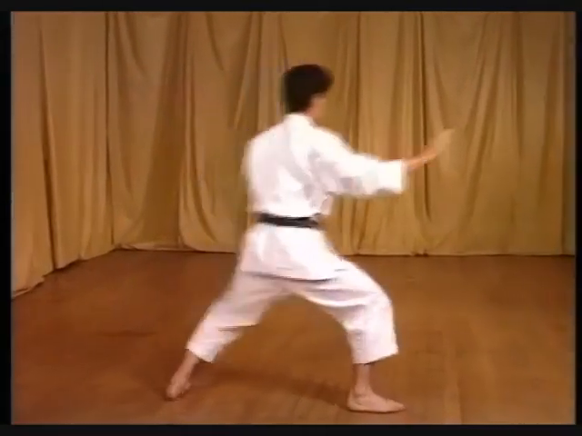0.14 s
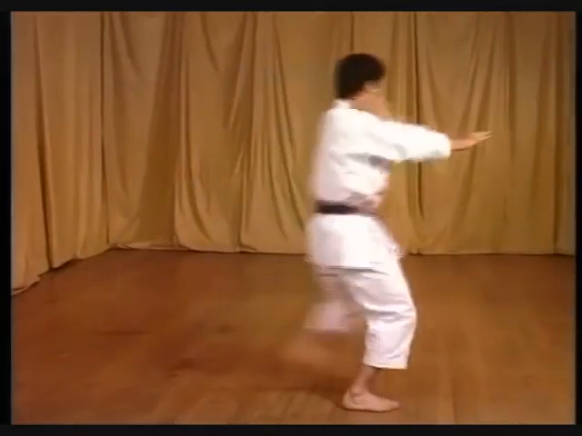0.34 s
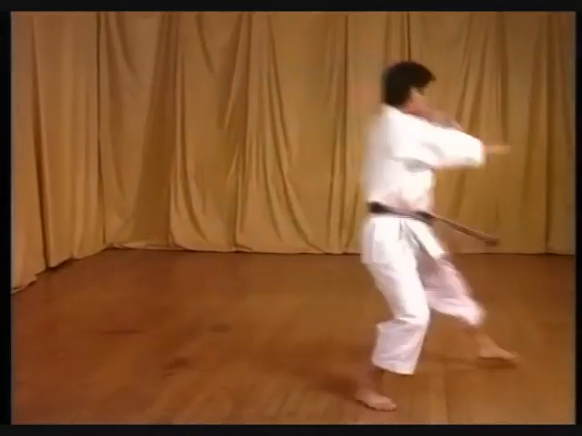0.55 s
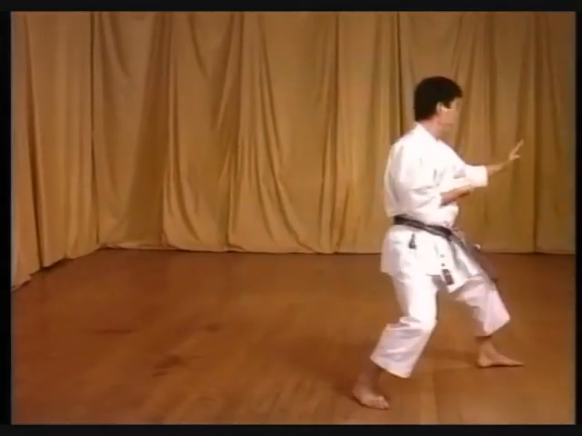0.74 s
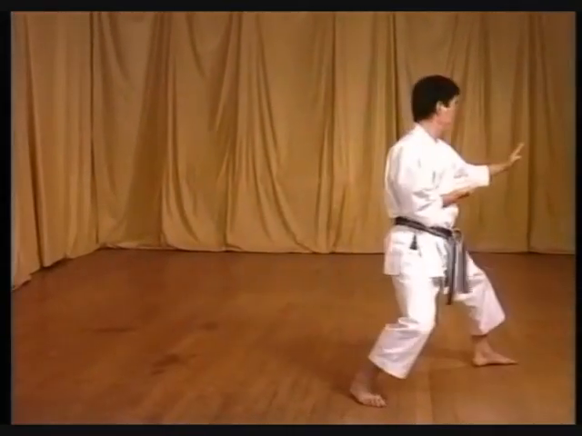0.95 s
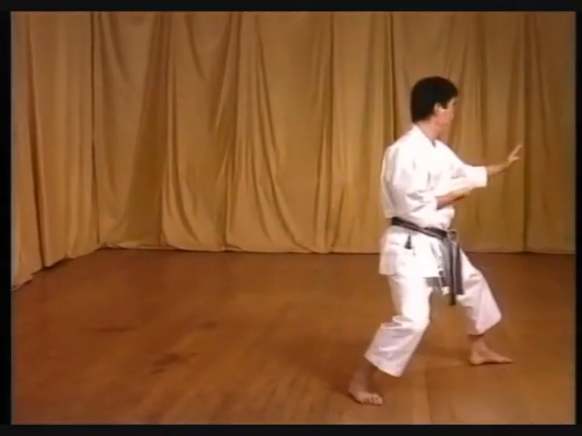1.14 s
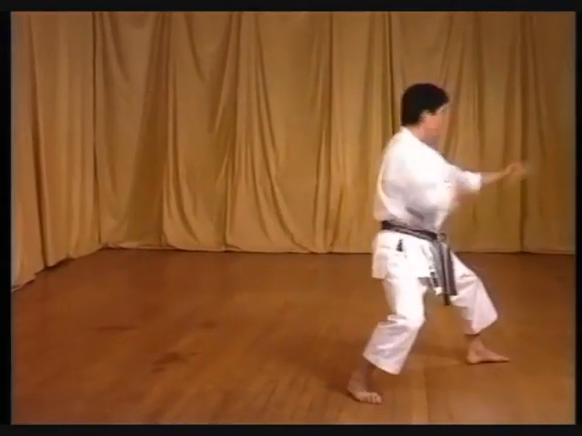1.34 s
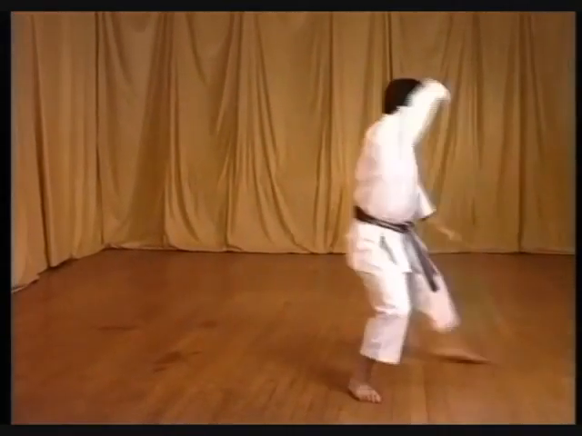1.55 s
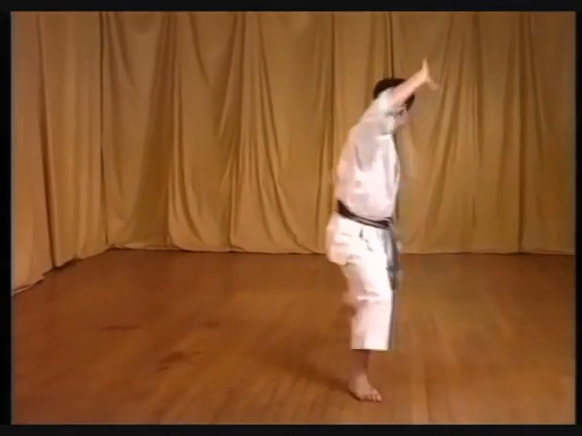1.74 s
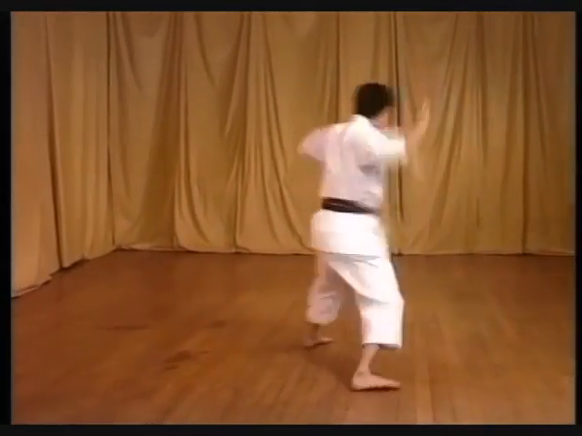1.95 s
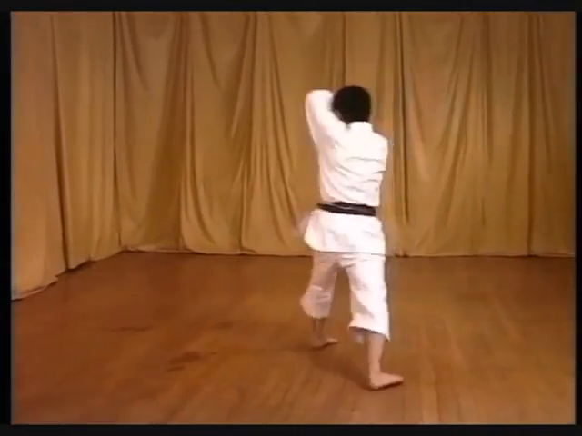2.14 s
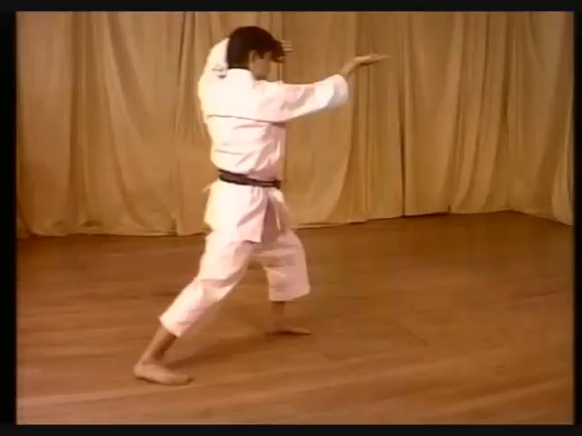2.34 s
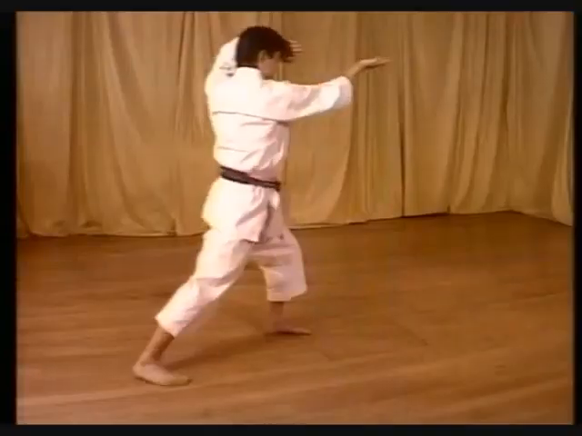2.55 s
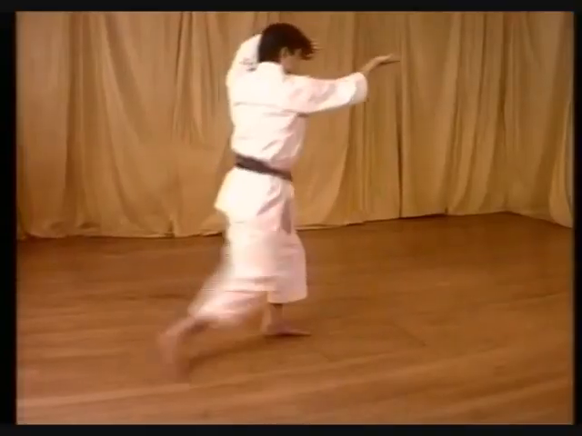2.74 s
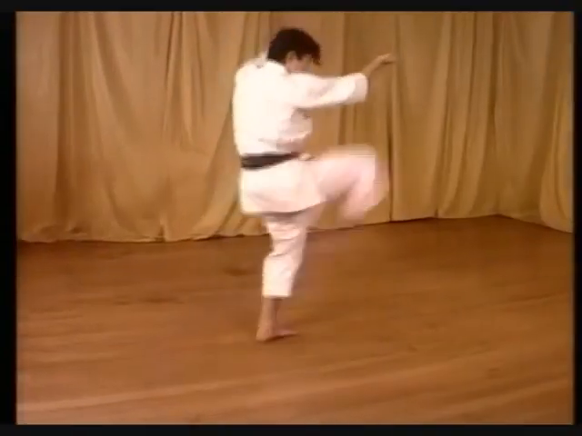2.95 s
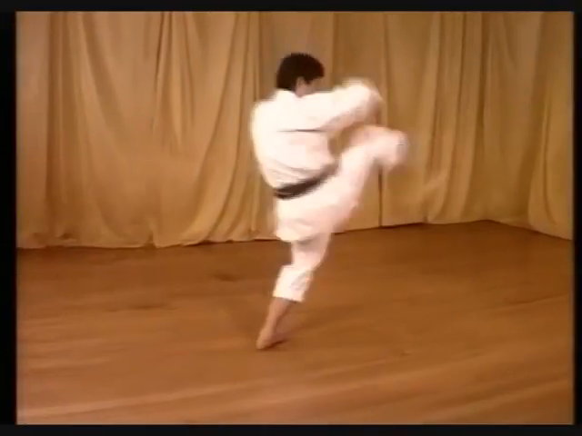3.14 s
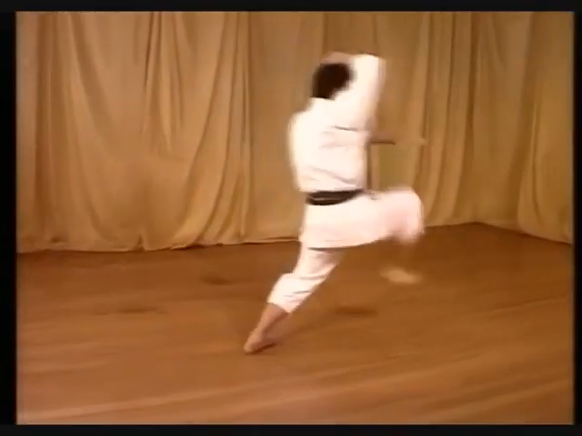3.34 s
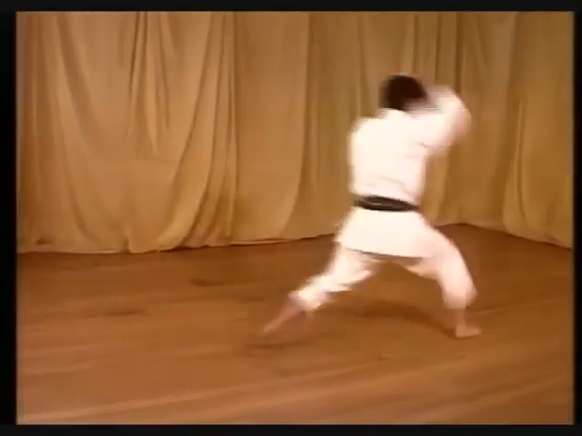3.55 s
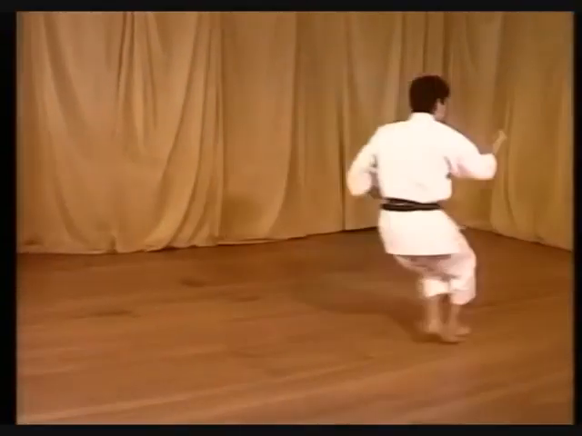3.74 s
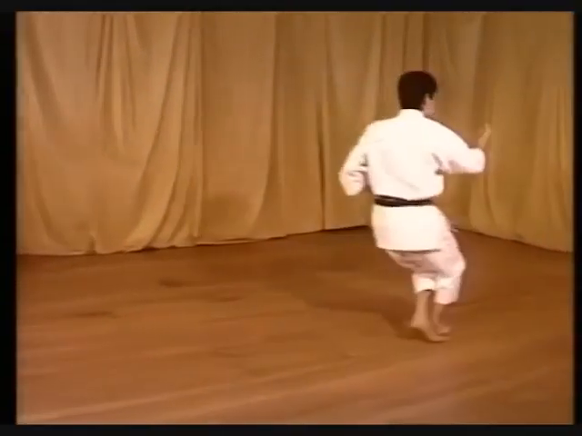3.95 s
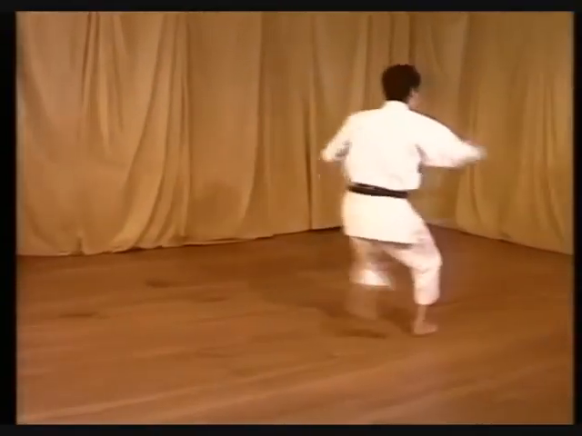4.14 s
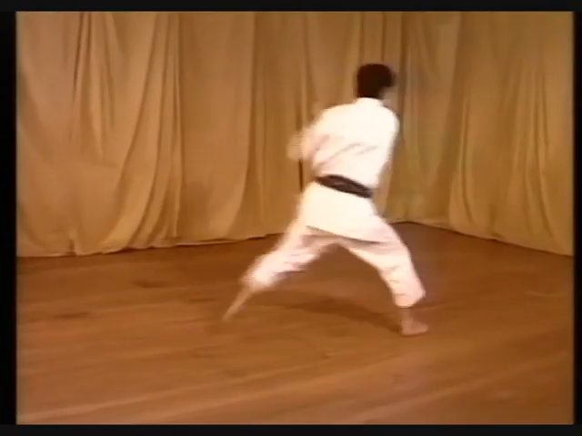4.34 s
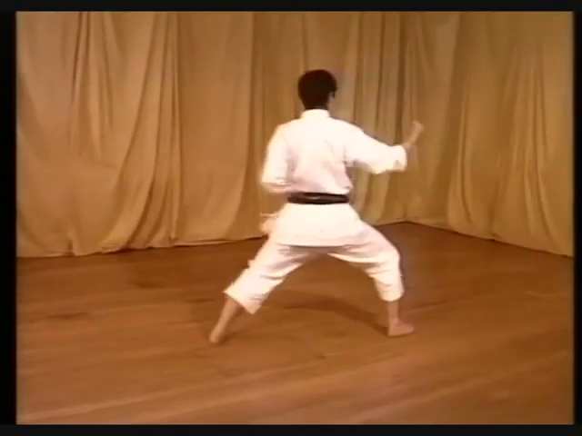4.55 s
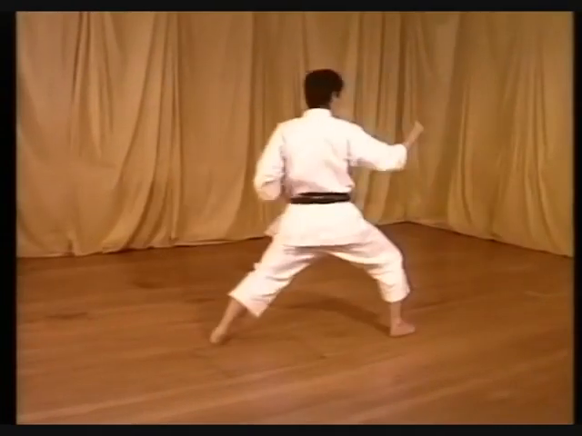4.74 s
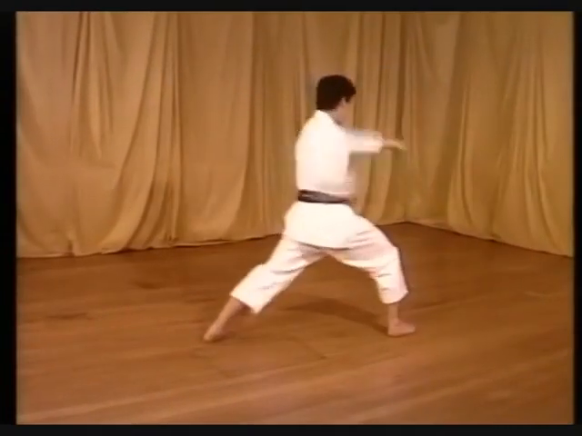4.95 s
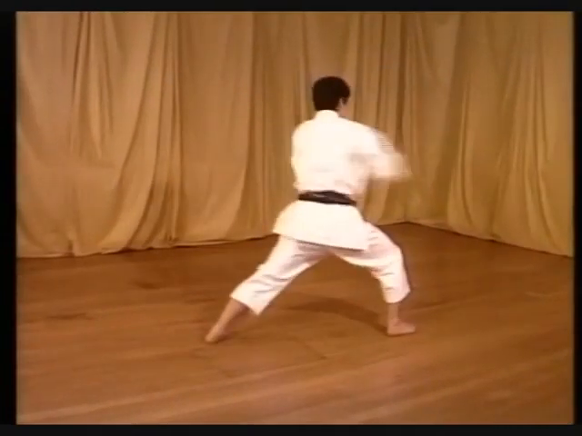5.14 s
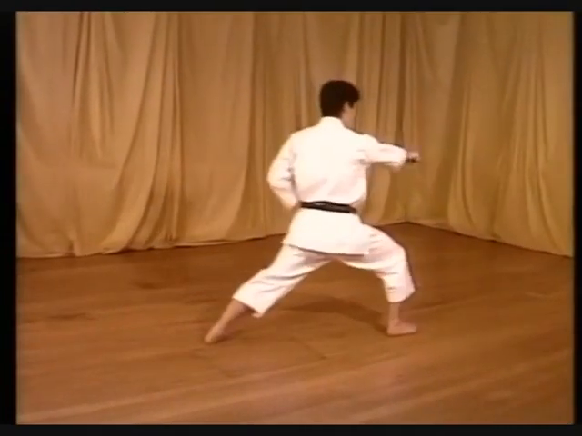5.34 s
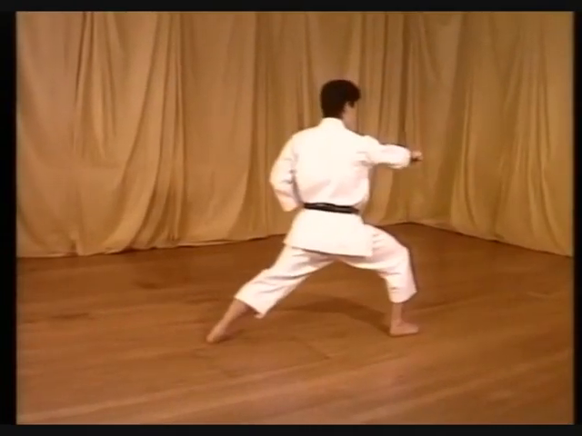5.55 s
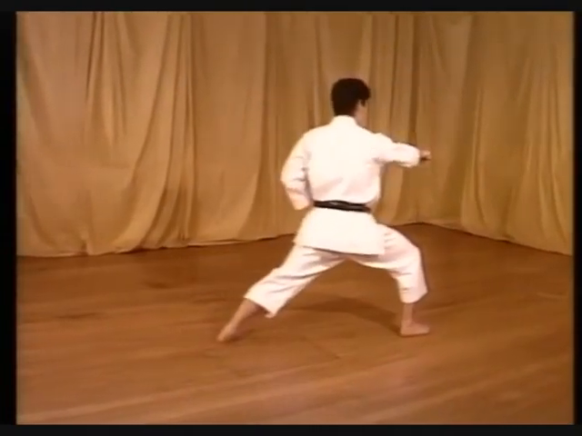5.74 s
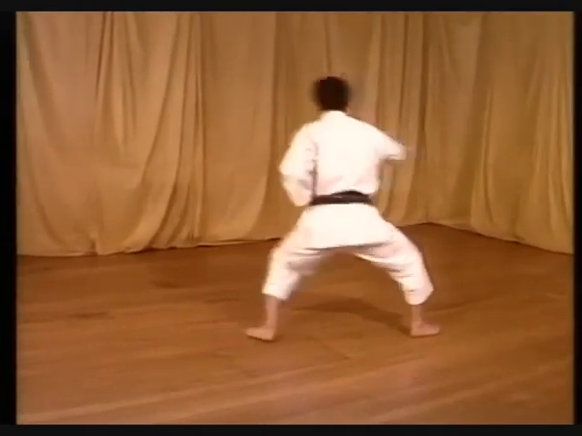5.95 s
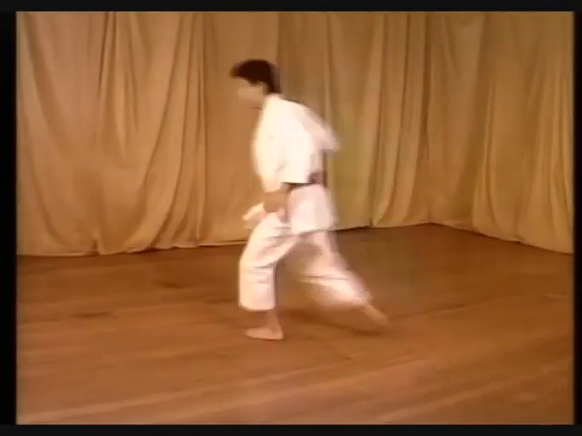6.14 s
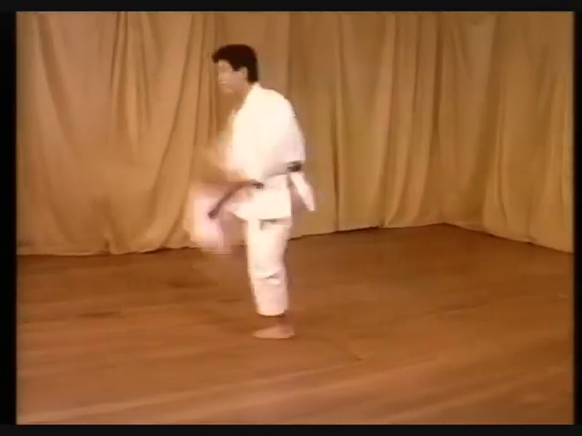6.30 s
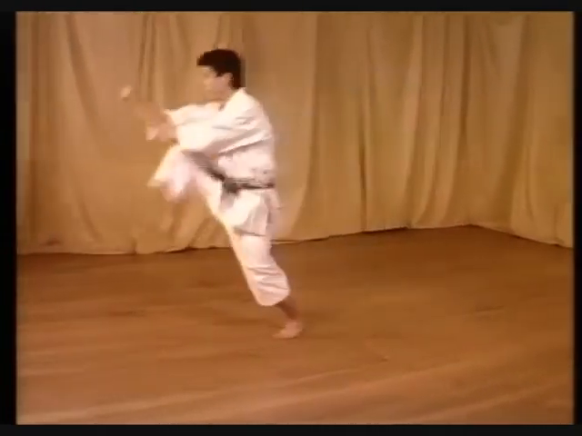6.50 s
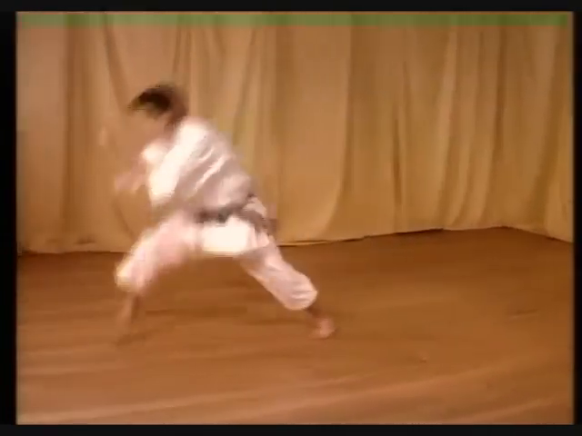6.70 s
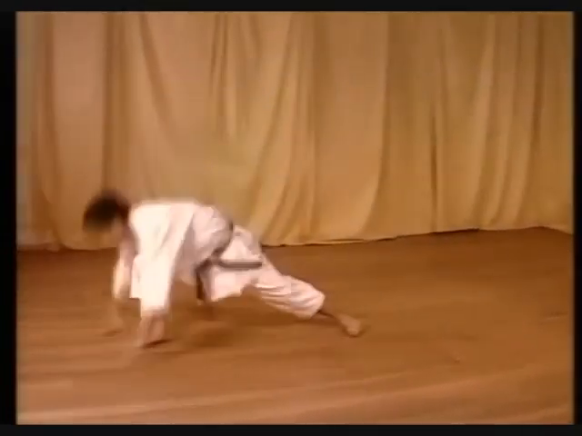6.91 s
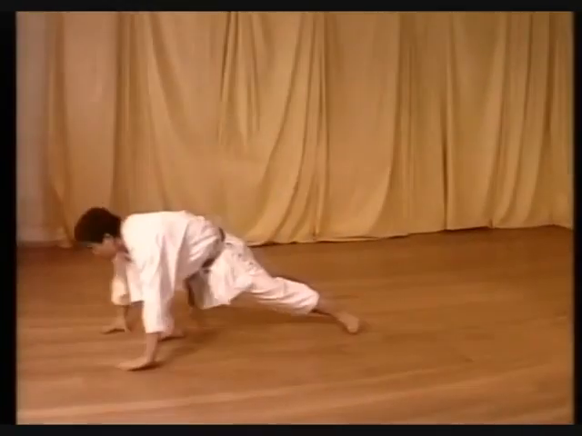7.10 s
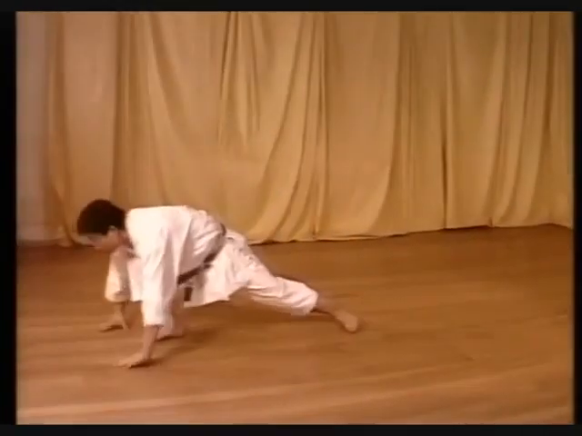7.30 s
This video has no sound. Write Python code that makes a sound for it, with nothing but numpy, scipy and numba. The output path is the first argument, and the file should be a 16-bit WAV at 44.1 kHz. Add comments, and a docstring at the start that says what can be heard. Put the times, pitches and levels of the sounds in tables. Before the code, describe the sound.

One performer in a heavy cotton suit moves through a martial arts routine on wooden boards. A short low sole squeak, soft cloth snaps and light steps come first; then a jump's hard landing, powerful sleeve snaps, and finally a heavy drop onto foot and hands. Short hall reverberation, soft hiss and hum, a single microphone with loud hits squashed.

```python
"""Cotton flaps and snaps, bare feet stamp and squeak: a karate routine on boards in a curtained hall.
Random impacts, shaped in time and spectrum, make the heavy suit rustle, flick, snap and zip.
Soles slide as banded noise, squeak as stick-slip tones, and land on boards that ring and boom.
The hall adds a decaying tail; hiss, hum and whine lie beneath. One microphone hears it all,
and a fast limiter flattens the hardest blows."""
import sys
import numpy as np
from scipy import signal
from scipy.fft import rfft, irfft
from scipy.io import wavfile
from numba import njit

SR = 44100
rng = np.random.default_rng(int(sys.argv[2]) if len(sys.argv) > 2 else 0)


def wav_record(signal):
    """Record a signal, one row per channel, as 16-bit PCM in the file named by sys.argv[1]."""
    frames = np.transpose(np.atleast_2d(signal))
    bounded = np.clip(frames, -1, 1)
    # unit amplitude maps onto the largest positive 16-bit level
    quanta = np.round(bounded * 32767).astype(np.int16)
    wavfile.write(sys.argv[1], SR, quanta)


N = 329413  # length in samples


def undb(db):
    """Level law: decibels to an amplitude ratio."""
    return 10 ** (np.asarray(db) / 20)


def unit(x):
    """Power normalisation: scale to rms 1."""
    return x / np.sqrt(np.mean(x ** 2))


def add(out, start_s, x):
    """Superposition: mix x in from start_s."""
    i = max(int(start_s * SR), 0)
    out[i:i + len(x)] += x[:N - i]


def response(spectrum, size=4096):
    """Minimum phase: the folded cepstrum gives a causal impulse response, here of unit energy."""
    hz, db = np.transpose(spectrum)
    grid = np.maximum(np.arange(size // 2 + 1) * SR / size, 1)
    level_db = np.interp(np.log(grid), np.log(hz), db)
    cepstrum = irfft(np.log(undb(level_db)))
    cepstrum[1:size // 2] *= 2
    cepstrum[size // 2 + 1:] = 0
    h = irfft(np.exp(rfft(cepstrum)))[:size // 2]
    return h / np.linalg.norm(h)


def colour(x, spectrum):
    """Linear filtering: convolution gives x the spectrum."""
    return signal.oaconvolve(x, response(spectrum))[:len(x)]


def walk(rate_hz, size):
    """Slow fluctuation: straight lines join normal random values drawn rate_hz times a second."""
    at = np.arange(size) / SR * rate_hz
    return np.interp(at, np.arange(size // 8), rng.standard_normal(size // 8))


def crackle(rate_hz, spread_db, size):
    """Shot noise: random tiny impacts of either sign and uneven strength, rms 1."""
    hits = rng.random(size) < rate_hz / SR
    signs = rng.choice([-1, 1], size)
    strength = undb(spread_db * np.clip(rng.standard_normal(size), -2, 2))
    return unit(hits * signs * strength)


def burst(t, swell_s, fade_s):
    """Transient envelope: a linear climb to 1, then exponential decay."""
    return np.minimum(t / swell_s, 1) * np.exp(-np.maximum(t - swell_s, 0) / fade_s)


def slips(rate_hz, centre_hz, width_hz, size):
    """Band excitation: quick uneven slips ring one band, rms 1."""
    edges_hz = np.clip([centre_hz - width_hz / 2, centre_hz + width_hz / 2], 50, SR / 3)
    band = signal.butter(3, edges_hz, "band", fs=SR, output="sos")
    return unit(signal.sosfilt(band, crackle(rate_hz, 4.2, size)))


# room rumble and tape hiss: pitch_hz, relative density_db [dB per Hz]
BACKGROUND_SPECTRUM = [(25, 4.5), (50, 0.5), (80, -2), (150, -2.5), (350, -3), (600, -14.5), (1200, -16),
                       (2500, -23.5), (5000, -25), (11000, -24.5), (15500, -28)]
BACKGROUND_DB = -58
# mains hum and electronic whine: pitch_hz, level_db [rms at start], start_s, fading [dB per s]
HUM_AND_WHINE = [(50, -68, 0, -1.4), (150, -72, 0, 0), (100, -62, 2.42, 0), (9604, -76.5, 2.42, .8),
                 (15626, -81, 0, 0)]


def background():
    """Stationary noise plus steady tones, whose shared clock wavers slightly."""
    t = np.arange(N) / SR
    clock_s = np.cumsum(1 + .0008 * walk(30, N)) / SR
    tones = np.zeros(N)
    for pitch_hz, level_db, start_s, fading in HUM_AND_WHINE:
        amplitude = np.sqrt(2) * undb(level_db - fading * (t - start_s))
        tones += amplitude * np.sin(2 * np.pi * pitch_hz * clock_s) * (t >= start_s)
    noise = colour(rng.standard_normal(N), BACKGROUND_SPECTRUM)
    return tones + undb(BACKGROUND_DB) * noise


# reverberation of the hall by band: pitch_hz, t60_s, level_db
HALL_BANDS = [(60, 0.65, -11), (153, 0.66, -5.5), (400, 0.64, -7.5), (1000, 0.43, -9.5),
              (2500, 0.58, -14.5), (6000, 0.4, -8.5), (14000, 0.5, -6)]


def hall(x, gap_s=0.0034, shared_db=-3, shared_s=0.099):
    """Reverberation: direct sound, a short gap, then a dense noise tail with its own decay in each band."""
    t = np.arange(SR * 3 // 2) / SR
    hz, t60_s, level_db = np.transpose(HALL_BANDS)
    noise = rfft(rng.standard_normal(len(t)))
    log_hz = np.log(np.maximum(np.arange(len(noise)) * SR / len(t), 1))
    shared_decay = undb(shared_db) * np.exp(-t / shared_s)  # the same in every band
    onset = np.clip(t / gap_s - 1, 0, 1)
    tail = np.zeros(len(t))
    for share, decay_s, wet_db in zip(np.eye(len(hz)), t60_s, level_db):
        band = irfft(noise * np.interp(log_hz, np.log(hz), share), len(t))
        fade = (np.exp(-np.log(1000) * t / decay_s) + shared_decay) * onset
        tail += undb(wet_db) * band * fade / np.linalg.norm(fade)
    return x + signal.oaconvolve(x, tail)[:N]


# a limb swings through the suit: fastest_s, rise_s, fall_s, rustle level_db, rub_db [both before trim]
LIMB_SWINGS = [(.44, 0.11, 0.14, -40, -59), (.645, 0.033, 0.017, -36, -58),
               (1.485, .028, 0.059, -39.5, -52.5), (1.61, 0.092, 0.078, -32, -50.5),
               (2.16, 0.089, 0.062, -30, -54), (2.46, 0.049, 0.11, -44, -72),
               (2.64, 0.023, 0.072, -44, -72), (2.856, 0.031, 0.028, -34, -60),
               (3.10, 0.34, 0.26, -37, -57), (3.167, 0.029, 0.046, -21, -49.5),
               (4.22, 0.23, 0.25, -39.5, -66), (4.362, 0.019, .025, -29, -49),
               (4.47, 0.039, 0.068, -26.5, -50), (4.969, 0.07, 0.049, -30, -57.5),
               (5.084, 0.061, 0.048, -22, -47.5), (5.292, 0.033, 0.065, -26.5, -52.5),
               (6.04, 0.15, 0.17, -40, -62), (6.22, 0.025, 0.026, -27.5, -60),
               (6.34, 0.03, 0.097, -28.5, -51.5), (6.44, 0.046, 0.058, -29, -57),
               (6.536, 0.06, 0.046, -26, -39.5), (6.831, 0.078, 0.018, -43, -64),
               (7.08, 0.1, 0.19, -37, -64)]
# buckling cloth: pitch_hz, relative density_db [dB per Hz]
CLOTH_SPECTRUM = [(50, -27), (130, -16.5), (220, -8), (330, 0.5), (550, 0.5), (800, -4), (1200, -11.5),
                  (2000, -22), (3200, -35), (6000, -56), (15000, -48)]
# fine hiss, also of crisp fibres and slapping skin: pitch_hz, relative density_db [dB per Hz]
HISS_SPECTRUM = [(300, -16), (1500, 17), (3000, 11.5), (5000, 5), (6200, 2), (9000, -2), (12500, -2),
                 (15500, -17)]
FOLD_SPREAD_DB = 2.8
SWING_SHAPE = 0.96  # 1 = a pointed peak of speed, 2 = a rounded one


def rustle(cloth_trim_db=-3, hiss_trim_db=3.0, flutter_db=1.5):
    """Friction noise follows speed: folds buckle, while soles and sleeves rub with a fine hiss."""
    t, folds, rub = np.arange(N) / SR, np.zeros(N), np.zeros(N)
    for fastest_s, rise_s, fall_s, level_db, rub_db in LIMB_SWINGS:
        distance = np.maximum((fastest_s - t) / rise_s, (t - fastest_s) / fall_s)
        speed = np.exp(-distance ** SWING_SHAPE)
        folds = np.hypot(folds, speed * undb(level_db))  # powers add
        rub = np.hypot(rub, speed * undb(rub_db))
    flutter = undb(flutter_db * walk(60, N))
    cloth = colour(crackle(900, FOLD_SPREAD_DB, N) * folds * flutter, CLOTH_SPECTRUM)
    hiss = colour(crackle(9000, 2.8, N) * rub * flutter, HISS_SPECTRUM)
    return undb(cloth_trim_db) * cloth + undb(hiss_trim_db) * hiss


# cloth slides over cloth: loudest_s, half_length_s, level_db, centre_hz
WEAVE_ZIPS = [(0.723, 0.024, -41, 2830), (1.623, .07, -57, 4640), (2.178, 0.055, -50.5, 2590),
              (6.539, 0.053, -48.5, 4570)]
ZIP_WIDTH_HZ = 740


def zips(rib_rate_hz=2500):
    """Ribbed friction: ribs of the weave tick past each other in a narrow band that swells and fades."""
    out = np.zeros(N)
    t = np.arange(-SR // 4, SR // 4) / SR
    for loudest_s, half_s, level_db, centre_hz in WEAVE_ZIPS:
        swell = undb(level_db) * np.exp(-(t / half_s) ** 2)
        add(out, loudest_s + t[0], swell * slips(rib_rate_hz, centre_hz, ZIP_WIDTH_HZ, len(t)))
    return out


# soles and palms drag on the boards: start_s, level_db, length_s, centre_hz
FLOOR_SCUFFS = [(0.582, -38.5, .022, 576), (1.386, -49, 0.0052, 2750), (2.172, -28, 0.04, 414),
                (2.774, -39.5, 0.021, 930), (3.599, -44, 0.062, 810), (3.705, -50, 0.098, 1480),
                (4.083, -41.5, 0.054, 1510), (4.538, -22, 0.032, 730), (6.354, -38, 0.062, 1000),
                (7.011, -31, 0.086, 1000), (7.012, -21, .07, 520), (7.435, -53, 0.049, 1084)]
SCUFF_SWELL, SCUFF_WIDTH = 0.25, 0.73  # swell as a share of length; bandwidth as a share of centre


def scuffs(slip_rate_hz=2500):
    """Sliding friction: slips ring the patch that rubs; every drag swells briefly and trails off."""
    out = np.zeros(N)
    t = np.arange(SR // 2) / SR
    for start_s, level_db, length_s, centre_hz in FLOOR_SCUFFS:
        drag = burst(t, SCUFF_SWELL * length_s, (1 - SCUFF_SWELL) * length_s)
        rub = slips(slip_rate_hz, centre_hz, SCUFF_WIDTH * centre_hz, len(t))
        add(out, start_s, undb(level_db) * drag * rub)
    return out


# a sole pivots: loudest_s, half_length_s, pitch_hz, level_db, overtone_db [2nd harmonic], roughness [0-1]
SOLE_SQUEAKS = [(0.275, 0.0077, 419.2, -15.5, -22.5, 0.04), (0.306, 0.025, 400, -31.5, -10.5, 0.11),
                (1.96, 0.0081, 550, -27, -43, 0.17), (2.29, 0.018, 510, -31.5, -16, 0.19),
                (2.636, 0.032, 540, -42.5, -32, 0.17), (2.816, 0.024, 560, -33, -15, 0.09),
                (4.109, 0.014, 310.3, -20.5, -5, 0.11), (4.13, 0.0095, 288, -30, 6, 0.08),
                (4.15, 0.005, 335.6, -22, -16, 0.19), (4.189, 0.033, 330.8, -27.5, -17, 0.06)]


def squeaks(sag=0.02364, rolloff_db=-16):
    """Stick-slip oscillation: skin on varnish gives a short harmonic tone, its rough pitch arching."""
    out = np.zeros(N)
    t = np.arange(-SR // 10, SR // 10) / SR
    for loudest_s, half_s, pitch_hz, level_db, overtone_db, rough in SOLE_SQUEAKS:
        away = (t / half_s) ** 2
        bend = 1 - sag * np.minimum(away, 2) + rough * walk(286.0, len(t))
        phase = 2 * np.pi * np.cumsum(pitch_hz * bend) / SR
        tone = np.sin(phase)
        for k in range(2, 9):
            tone += undb(overtone_db + rolloff_db * np.log2(k - 1)) * np.sin(k * phase)
        add(out, loudest_s + t[0], undb(level_db) * np.sqrt(2) * np.exp(-away) * tone)
    return out


# the loudest single folds flick over, plus one low dull knock at 2.937 s: start_s, peak level_db, dulled above
# top_hz
FOLD_FLICKS = [(0.2142, -38, 2000), (0.709, -12.5, 8100), (.733, -10.5, 6000), (1.546, -23, 8000),
               (1.591, -25.5, 2500), (2.041, -19.5, 4000), (2.126, -23, 2500), (2.345, -27, 1200),
               (2.937, -24, 794), (3.072, -21, 5000), (3.127, -21, 1550), (3.174, -18, 2500),
               (3.246, -20.5, 8000), (3.666, 0, 6000), (3.697, 4.5, 5130), (4.442, -20.5, 3900),
               (4.994, -30, 2000), (5.085, -12, 5150), (5.320, -1.5, 6000), (5.345, -14, 7000),
               (5.769, -33.5, 1780), (6.194, -18, 3000), (6.246, -18.5, 9000), (6.417, -17.5, 1190),
               (7.016, -10.5, 1500), (7.119, -21, 910), (7.234, -25.5, 5070)]
# taut cloth, flicked or snapped: pitch_hz, relative density_db [dB per Hz]
SNAP_SPECTRUM = [(50, -29.5), (130, -13.5), (280, 1), (450, 4), (700, 0), (1100, -6), (2000, -17.5),
                 (3200, -30.5), (6000, -45), (15000, -63)]


def flicks(shiver_db=-19, shiver_s=0.0035):
    """Impulse response: a lone fold pops and shivers for a moment; thick folds sound duller."""
    out = np.zeros(N)
    t = np.arange(SR // 20) / SR
    for start_s, level_db, top_hz in FOLD_FLICKS:
        shiver = undb(shiver_db) * rng.standard_normal(len(t)) * np.exp(-t / shiver_s)
        push = (t == 0) + shiver
        dulling = signal.butter(2, min(top_hz, SR / 3), fs=SR, output="sos")
        pop = signal.sosfilt(dulling, colour(push, SNAP_SPECTRUM))
        add(out, start_s, undb(level_db) * pop / np.abs(pop).max())
    return out


# the suit whips taut: start_s, level_db, swell_s, fade_s, then relative to level: crisp_db, crack_db
SUIT_SNAPS = [(.651, -28.5, .0027, 0.037, -11.5, -27), (.700, -27.5, 0.027, 0.018, -11.5, -4.5),
              (2.039, -34.5, 0.002, 0.061, -28, -8.5), (2.149, -31.5, 0.0041, 0.028, -34, -15),
              (2.272, -38, 0.0029, 0.028, -14, -7), (3.148, -24, 0.018, 0.057, -26, -13.5),
              (4.341, -26.5, 0.00087, 0.053, -32, -13.5), (4.537, -12.5, 0.0017, 0.044, -44, -25),
              (4.585, -24.5, 0.0068, 0.075, -29, -17), (5.056, -22.5, 0.0016, .055, -22.5, -10.5),
              (5.309, -15.5, 0.0085, 0.052, -24.5, -12), (6.188, -25, 0.0017, 0.0076, -40, -30),
              (6.244, -37, .002, 0.018, -11, -16), (6.322, -25.5, 0.0026, 0.021, -18.5, -16),
              (6.480, -25, 0.0041, 0.013, -29, -11.5)]
CRACK_HZ, CRACK_WIDTH_HZ = 1500, 1500


def snaps(slap_rate_hz=2200, fibre_rate_hz=7000, fibre_spread_db=6, crack_rate_hz=2000):
    """Sudden arrest: a sleeve or trouser leg stops dead in slaps, a mid-range crack and fibre noise."""
    slaps, fibres, cracks = np.zeros((3, N))
    t = np.arange(SR // 2) / SR
    for start_s, level_db, swell_s, fade_s, crisp_db, crack_db in SUIT_SNAPS:
        force = undb(level_db) * burst(t, swell_s, fade_s)
        crack = slips(crack_rate_hz, CRACK_HZ, CRACK_WIDTH_HZ, len(t))
        add(slaps, start_s, force * crackle(slap_rate_hz, 6.9, len(t)))
        add(fibres, start_s, force * undb(crisp_db) * crackle(fibre_rate_hz, fibre_spread_db, len(t)))
        add(cracks, start_s, force * undb(crack_db) * crack)
    return colour(slaps, SNAP_SPECTRUM) + colour(fibres, HISS_SPECTRUM) + cracks


# feet and hands land: start_s, board_db [before trims], boom_db, slap_db
LANDINGS = [(.654, -29, -25, -24), (.672, -29, -30.5, -41), (.723, -39, -37, -40), (.985, -42.5, -63, -70),
            (1.944, -39, -43, -40.5), (1.953, -33, -39.5, -57), (2.152, -32.5, -61, -56),
            (2.615, -46.5, -46, -75), (3.645, -6, -23, -18.5), (3.695, -6.5, -10.5, -41),
            (4.535, -17, -21.5, -22), (6.036, -59, -42, -65), (6.171, -25, -31.5, -55),
            (6.847, -10, -12, -25), (6.860, -16, -18, -24.5), (7.014, -20, -35, -49)]
# modes of the boards: pitch_hz, relative level_db, t60_s
BOARD_MODES = [(210, -18, 0.24), (276, -9, 0.15), (328, -21, 0.1), (342.4, 9.5, 0.081), (427, 5, 0.25),
               (480, 5.5, 0.16), (537, 3.5, 0.38), (615, -14, 0.39), (790, -21, 0.056), (1068, 6.5, 0.038)]
# knock of the boards: pitch_hz, relative density_db [dB per Hz]
KNOCK_SPECTRUM = [(25, -29), (50, -25), (150, -12.5), (320, 6), (600, -1), (1000, -13.5), (2000, -22),
                  (3500, -37.5), (7000, -44), (15000, -55)]
# boom of the whole floor: pitch_hz, relative density_db [dB per Hz]
BOOM_SPECTRUM = [(25, -27), (50, -14), (80, -4), (125, -3), (200, -2), (300, -6.5), (600, -28), (3000, -80)]


def stamps(modes_trim_db=-5, knock_trim_db=-3, knock_s=0.083, boom_swell_s=0.019, boom_s=0.069):
    """Modal impact: skin slaps, the boards knock and ring, and the whole floor booms a moment later."""
    ring, knock, boom, slap = np.zeros((4, N))
    t = np.arange(SR * 3 // 4) / SR
    hz, mode_db, t60_s = np.transpose(BOARD_MODES)[:, :, None]
    weight = undb(mode_db) / np.linalg.norm(undb(mode_db))
    decay = np.exp(-np.log(1000) * t / t60_s)
    for start_s, board_db, boom_db, slap_db in LANDINGS:
        # every landing detunes the modes a little and draws their signs afresh
        detune, push = rng.standard_normal((2, len(BOARD_MODES), 1))
        tones = np.sin(2 * np.pi * hz * (1 + 0.0094 * detune) * t)
        modes = np.sum(np.sign(push) * weight * tones * decay, axis=0)
        # countless weaker modes blur into noise
        knock_noise, boom_noise, slap_noise = rng.standard_normal((3, len(t)))
        add(ring, start_s, undb(board_db + modes_trim_db) * np.sqrt(2) * modes)
        add(knock, start_s, undb(board_db + knock_trim_db) * knock_noise * burst(t, 0.0011, knock_s))
        add(boom, start_s, undb(boom_db) * boom_noise * burst(t, boom_swell_s, boom_s))
        add(slap, start_s, undb(slap_db) * slap_noise * burst(t, .0008, .002))
    floor = ring + colour(knock, KNOCK_SPECTRUM) + colour(boom, BOOM_SPECTRUM)
    return floor + colour(slap, HISS_SPECTRUM)


def scene():
    """Superposition: the performer excites the hall, and the background is added dry."""
    suit = rustle() + zips() + flicks() + snaps()
    feet = scuffs() + squeaks() + stamps()
    return (hall(suit + feet) + background())[None]


@njit
def follow(x, attack, release):
    """Envelope detection: a one-pole follower with a quick rise and a slower fall."""
    out, e = np.empty(len(x)), 0.
    for i in range(len(x)):
        e += (x[i] - e) * (attack if x[i] > e else release)
        out[i] = e
    return out


TOP_HZ = 15850


def record(dry, ceiling_db=-8, attack_s=.0001, release_s=0.0051):
    """Dynamic limiting: fast gain reduction, then soft saturation and a steep low-pass."""
    attack, release = 1 - np.exp(-1 / (attack_s * SR)), 1 - np.exp(-1 / (release_s * SR))
    peak = follow(np.abs(dry[0]), attack, release)
    limited = dry / np.maximum(peak / undb(ceiling_db), 1)
    rounded = limited / (1 + (limited / .36) ** 6) ** (1 / 6)  # saturates at .36
    low_pass = signal.ellip(10, .2, 70, TOP_HZ, fs=SR, output="sos")
    return signal.sosfilt(low_pass, rounded)


dry = scene()
out = record(dry)
wav_record(out)
```